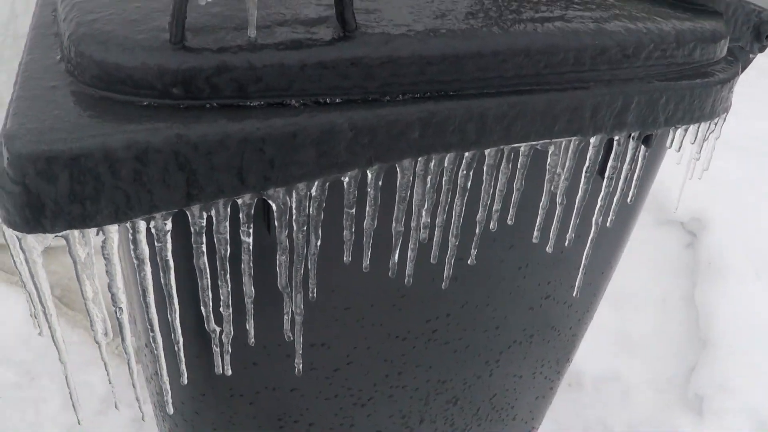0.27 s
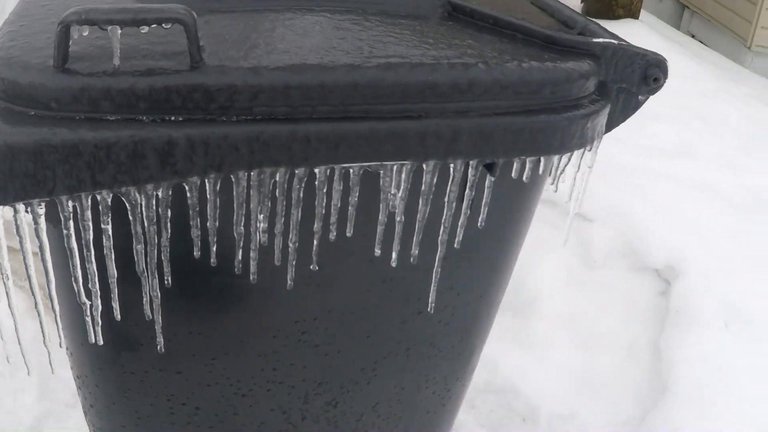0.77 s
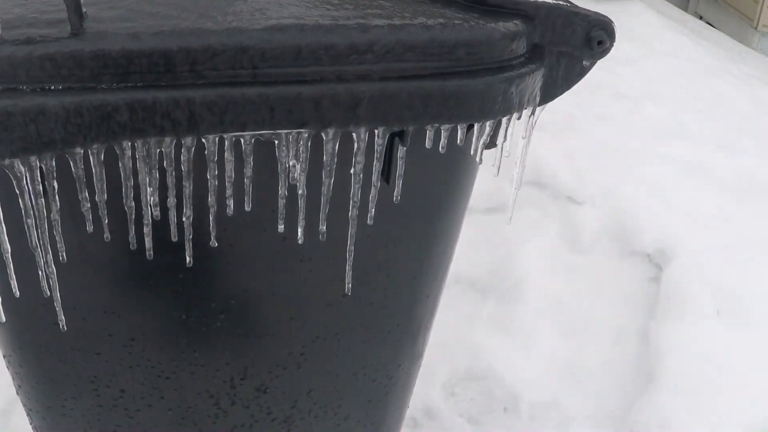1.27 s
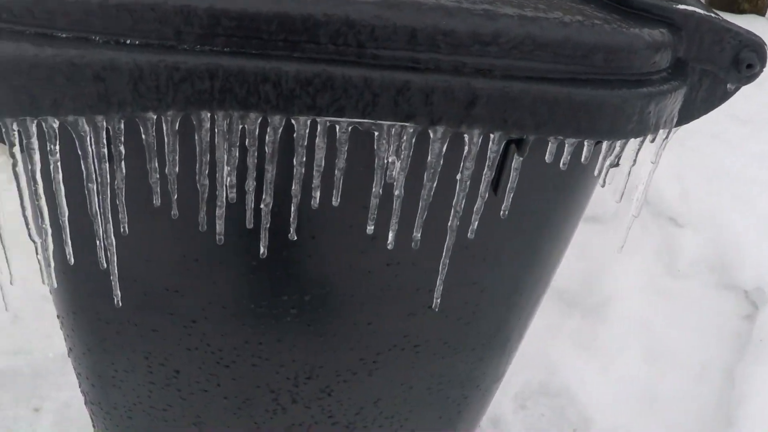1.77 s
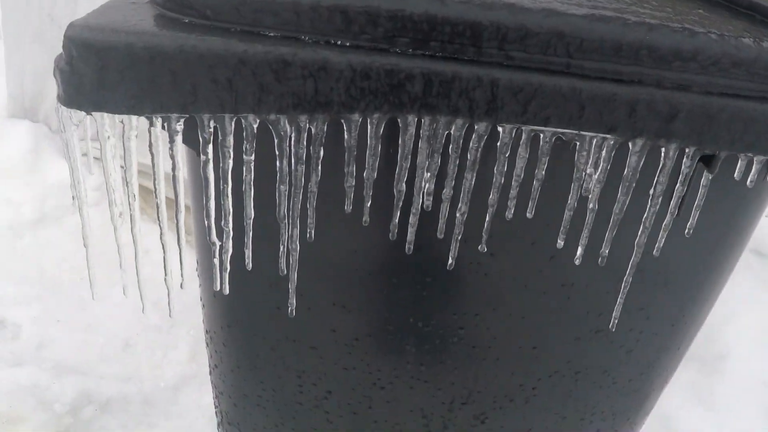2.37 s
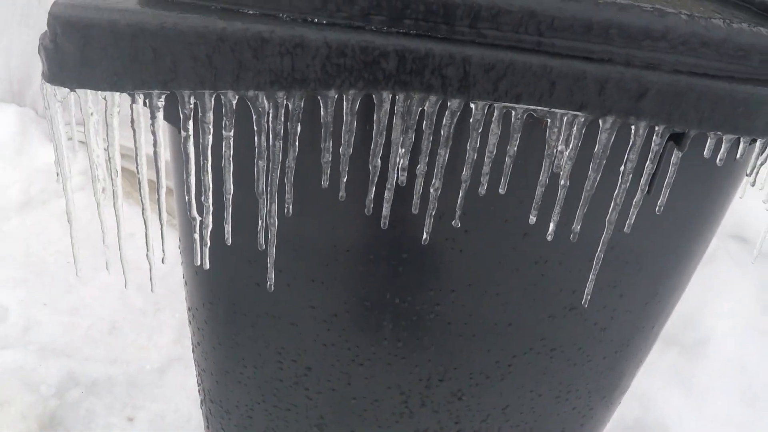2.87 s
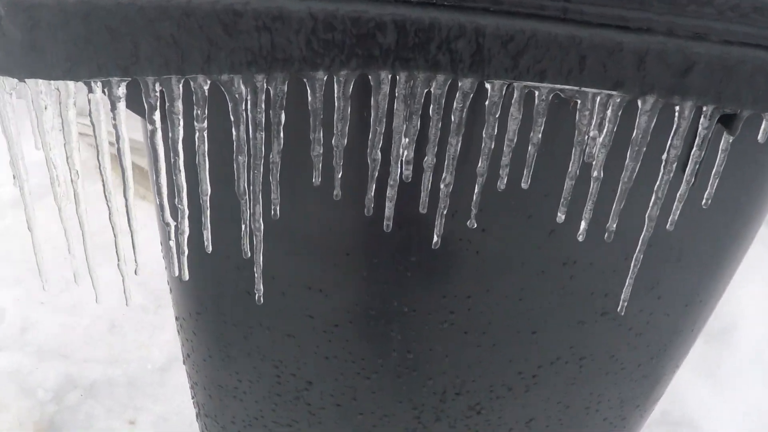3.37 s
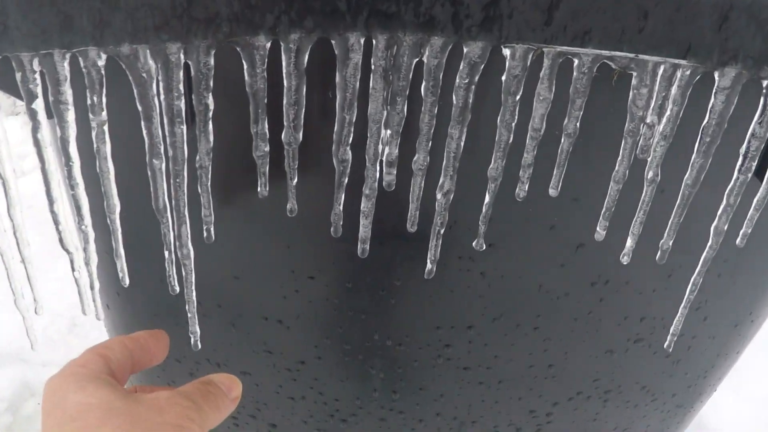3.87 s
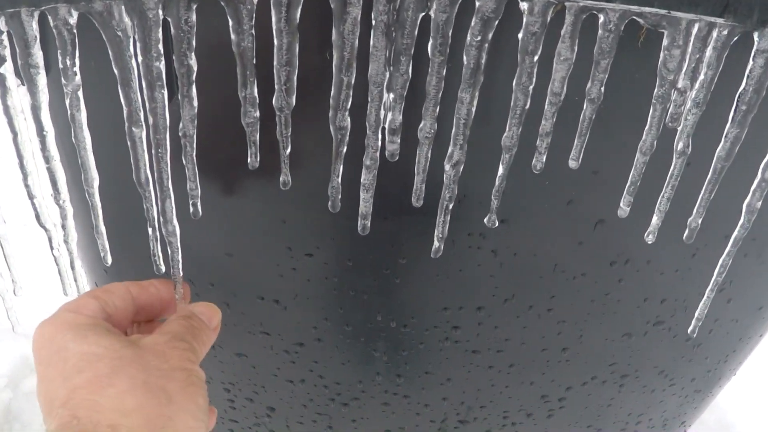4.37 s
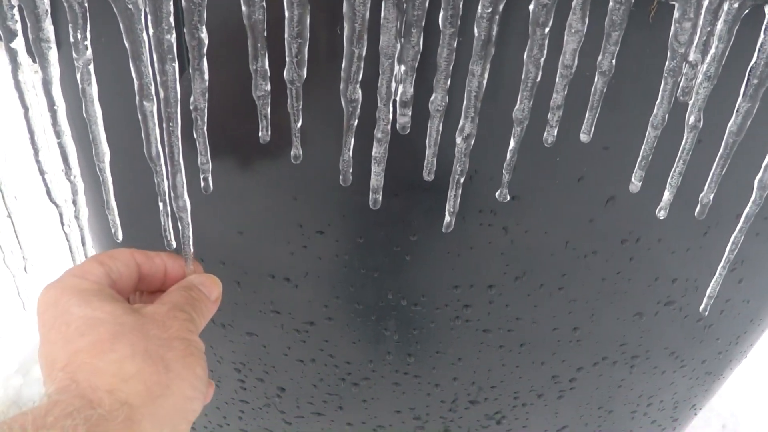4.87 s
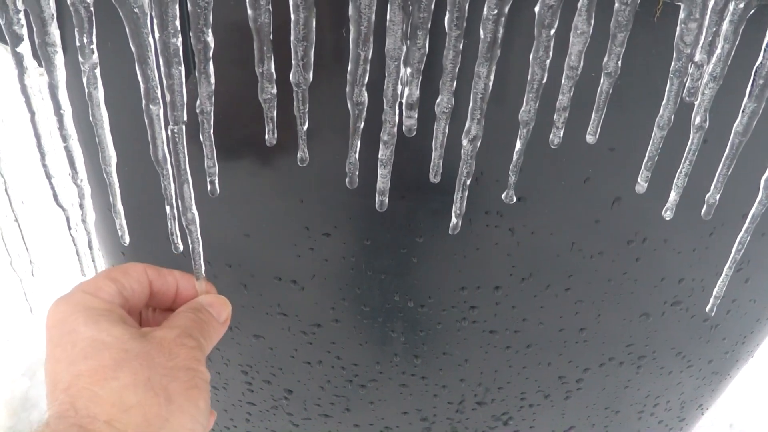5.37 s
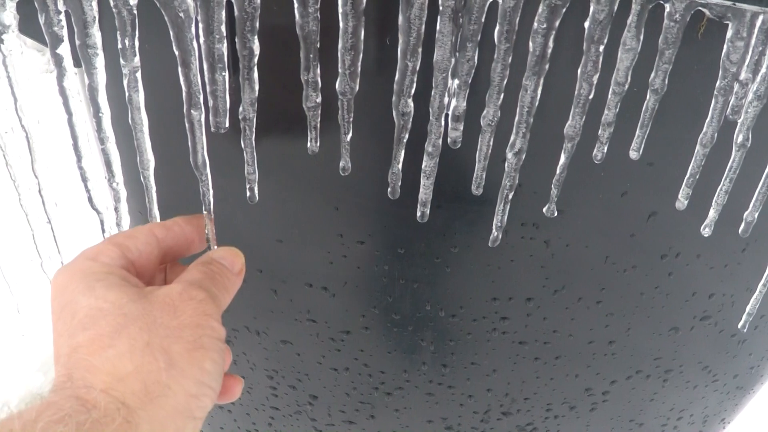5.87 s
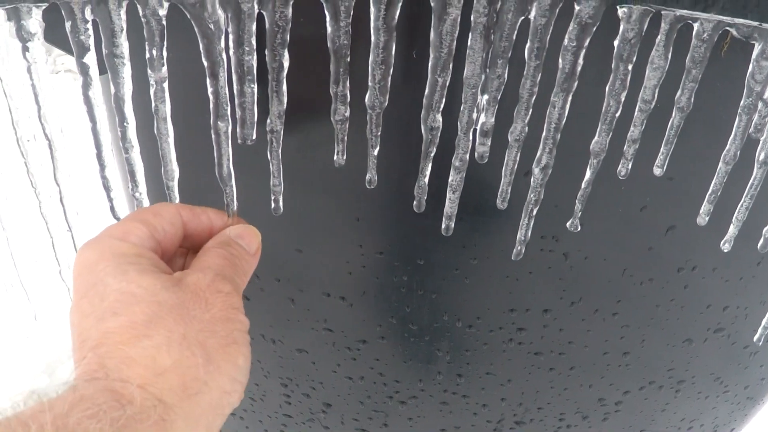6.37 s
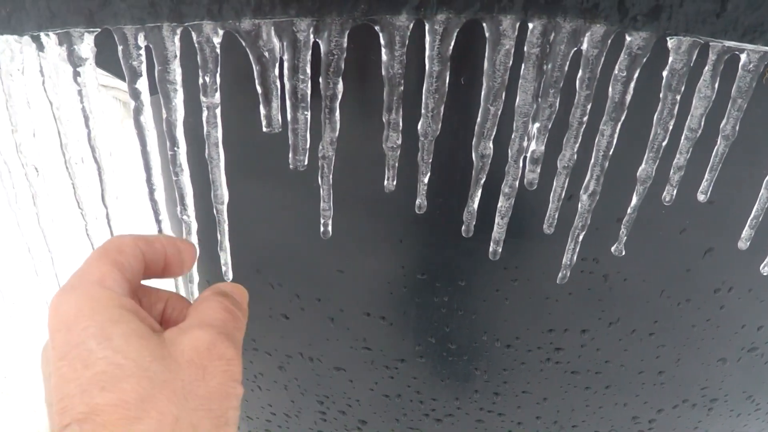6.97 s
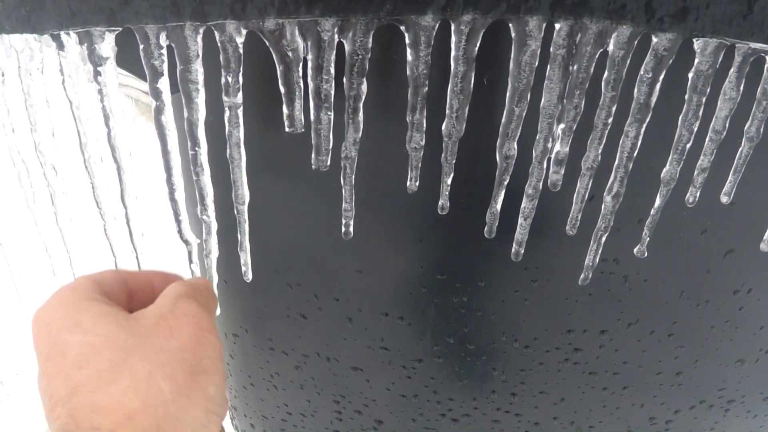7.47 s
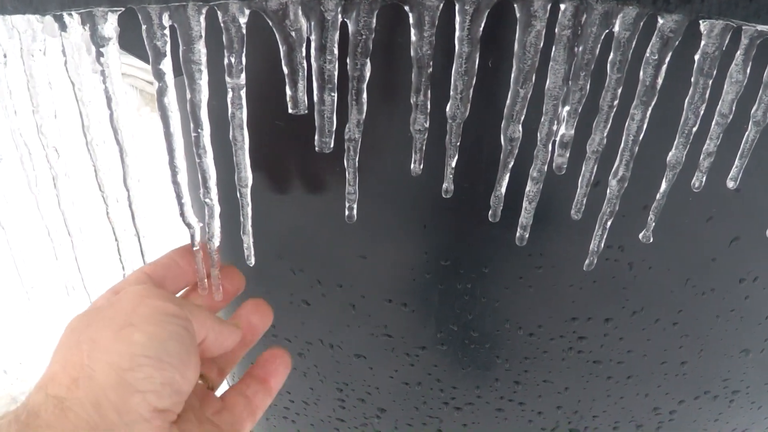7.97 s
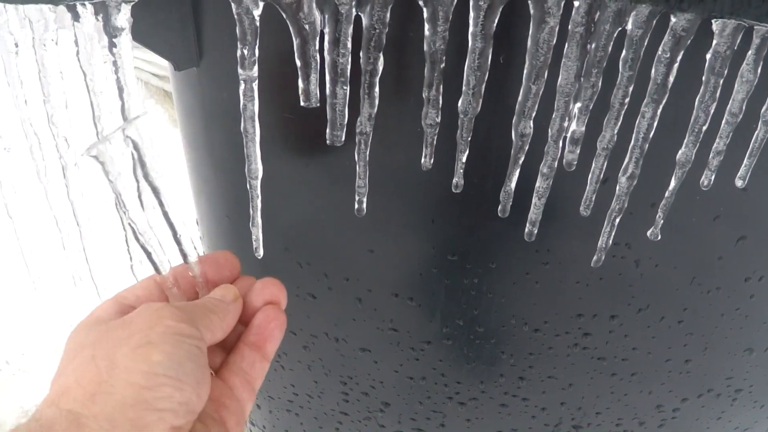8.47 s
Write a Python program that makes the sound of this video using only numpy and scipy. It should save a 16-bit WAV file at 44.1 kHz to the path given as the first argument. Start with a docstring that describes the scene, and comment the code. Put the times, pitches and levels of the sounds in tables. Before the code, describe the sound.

Close outdoor sound in a quiet snowy yard. Slow, uneven boot steps break crisp snow crust with crackles, soft crushing and dull thuds, then stop. Soft taps follow; an icicle snaps with a hollow plastic knock, another cracks brightly, and ice ticks and squeaks against ice. More sharp breaks come near the end, one answered by the bin. A faint low rumble and hum run throughout.

```python
"""A yard in still winter air: steps on crusted snow near a plastic bin, then icicles breaking off its lid.
Crust crackles as bursts of shaped noise over crushed snow and dull low-passed thuds.
Icicles crack as filtered noise and ring as decaying modes; the hollow bin's modes answer some breaks.
Rubbed ice ticks and squeaks in tiny pings; soft taps, a hum and a distant rumble fill the rest."""
import sys
import numpy as np
from scipy import signal
from scipy.io import wavfile

SR = 44100
rng = np.random.default_rng(int(sys.argv[2]) if len(sys.argv) > 2 else 0)


def to_wav(sig):
    """Store sig (one row per channel, or 1-D mono) as 16-bit WAV at the path in sys.argv[1].

    Samples outside -1..1 are clipped; the rate is SR.
    """
    pcm = np.clip(np.atleast_2d(sig), -1, 1) * 32767
    pcm = np.round(pcm).astype(np.int16)
    wavfile.write(sys.argv[1], SR, pcm.T)  # frames by channels


N = 384417
T = np.arange(SR // 3) / SR  # time within one event, s


def amp(db):
    """Decibels to gain."""
    return 10 ** (np.asarray(db) / 20)


def evened(x):
    """Scales to rms 1."""
    return x / np.sqrt(np.mean(x ** 2) + 1e-20)


def sized(x, level_db, length_s):
    """Gives x the energy of a sound of rms level_db that lasts length_s."""
    return amp(level_db) * x * np.sqrt(length_s * SR / (np.sum(x ** 2) + 1e-20))


def add(mix, start_s, sound):
    """Mixes a sound in at start_s."""
    part = mix[max(round(start_s * SR), 0):][:len(sound)]
    part += sound[:len(part)]


def colour(x, outline):
    """Causal minimum-phase filter with the given (freq_hz, gain_db) outline."""
    hz, db = np.transpose(outline)
    grid_hz = abs(np.fft.fftfreq(8192, 1 / SR))
    gain_db = np.interp(np.log(grid_hz + 1), np.log(hz + 1), db)
    spectrum = np.exp(np.conj(signal.hilbert(np.log(amp(gain_db)))))
    impulse = np.fft.ifft(spectrum).real[:len(grid_hz) // 2]
    return signal.fftconvolve(x, impulse)[:len(x)]


def passed(x, hz, kind, order=2):
    """Low-, high- or band-pass."""
    sos = signal.butter(order, np.clip(hz, 10, SR / 2.1), kind, fs=SR, output="sos")
    return signal.sosfilt(sos, x)


def drift(rate_hz, size=N):
    """Random line of rms 1 with rate_hz knots a second."""
    knots = rng.standard_normal(int(size / SR * rate_hz) + 3)
    return evened(np.interp(np.arange(size) / SR * rate_hz, np.arange(len(knots)), knots))


def held(start_s, end_s, attack_s, release_db_per_s):
    """Envelope that rises from start_s and falls after end_s."""
    t = np.arange(N) / SR
    rise = np.clip((t - start_s) / attack_s, 0, 1)
    return rise * amp(-release_db_per_s * np.maximum(t - end_s, 0))


def ring(modes):
    """Dying modes; each blow lands on another spot and weights them anew."""
    out = np.zeros(len(T))
    for hz, db, t60_s in modes:
        decay = amp(db + rng.normal(0, 2.1) - 60 * T / t60_s)
        out += decay * rng.choice([-1, 1]) * np.sin(2 * np.pi * hz * T)
    return out


def fracture(length_s, t60_s, tail_db, tail_t60_s, grain_db):
    """A run of tiny ruptures lasts length_s, then dies away with a slower scatter."""
    after_s = np.maximum(T - length_s, 0)
    shape = amp(-60 * after_s / t60_s) + amp(tail_db - 60 * after_s / tail_t60_s)
    return shape * rng.standard_normal(len(T)) * amp(grain_db * drift(1497, size=len(T)))


# distant rumble and hiss, relative outline: freq_hz, gain_db
AIR_OUTLINE = [(12, -30), (20, 1), (64, 2.5), (116, -6.5), (140, -14.5), (166, -10), (202, -14),
               (245, -9.5), (266, -14.5), (362, -7.5), (631, -24), (1010, -33.5), (1450, -35.5),
               (5090, -39.5), (15500, -52)]
# hum partials, centre pitch and level: pitch_hz, level_db
HUM_PARTIALS = [(64, -72), (119, -74.5), (241, -67), (361, -74), (403, -76)]


def background():
    """Low distant rumble under thin hiss, with a hum wavering in pitch and level."""
    air_db = -54.5 + 0.37 * drift(2.2)
    out = evened(colour(rng.standard_normal(N), AIR_OUTLINE)) * amp(air_db)
    for hz, db in HUM_PARTIALS:
        level = amp(db + 3.1 * drift(5.7)) * np.sqrt(2)
        phase = 2 * np.pi * np.cumsum(hz + 2.206 * drift(14)) / SR
        out += level * np.sin(phase)
    return out


# boot's weight resting on packed snow: set_down_s, lifted_s, fizz_db
BOOT_LOADS = [(-.06, .22, -66), (.56, 0.794, -63), (1.244, 1.483, -71), (1.589, 2.04, -66),
              (2.653, 2.998, -70.5), (3.137, 3.557, -67)]
# cracking crust, relative outline: freq_hz, gain_db
CRUST_OUTLINE = [(880, -39.5), (1500, -12), (1920, -7.5), (2520, -6.5), (2890, -2.5), (3610, -9),
                 (5040, -4.5), (6960, -13.5), (7600, -14.5), (8620, -20), (13800, -23), (15500, -16)]
# snow crushed by a medium step, relative outline: freq_hz, gain_db
CRUSH_OUTLINE = [(480, -35), (780, 6), (1050, 8), (1650, -1.5), (2700, -30.5)]
LOAD_S, RELAX_DB_PER_S = 0.07, 59  # fizz swell under load; fade once lifted


def settling():
    """Fine grains keep giving way in clumps while weight rests on the snow."""
    loads = [amp(db) * held(start_s, end_s, LOAD_S, RELAX_DB_PER_S) for start_s, end_s, db in BOOT_LOADS]
    level = np.max(loads, axis=0)
    edges_hz = np.geomspace(1000, 15500, num=6)
    fizz = rng.standard_normal(N)
    for band_hz in zip(edges_hz, edges_hz[1:]):  # coarse and fine grains break independently
        hits = rng.random(N) < 200 / SR  # 200 a second
        grains = hits * amp(4.5 * np.minimum(rng.exponential(1, N), 3.5))
        bursts = signal.oaconvolve(grains, amp(-60 * T / 0.014))[:N] * rng.standard_normal(N)
        fizz += passed(evened(bursts), band_hz, "band") * amp(3.6 * drift(25))
    crust = evened(colour(fizz, CRUST_OUTLINE))
    crush = evened(colour(fizz, CRUSH_OUTLINE))
    powder = evened(passed(fizz, 4700, "high"))
    return level * (crust + amp(-9.5) * crush + amp(-21.5) * powder)


CRUSH_DB = -7.5  # against the mean of crackle_db and thud_db
YIELD_DB, YIELD_SLOPE = -27, 1.34  # past this thud_db the snow gives way: extra crush dB per dB


def crunch(length_s, crackle_db, thud_db, thud_hz):
    """A piece of crust crackles, the snow below is crushed, and the boot thuds down."""
    crackle = fracture(length_s, t60_s=0.012, tail_db=-8, tail_t60_s=0.095, grain_db=4.5)
    crackle *= np.clip(T / (0.4 * length_s), 0.2, 1)  # break spreads as the weight comes on
    crackle = colour(crackle, CRUST_OUTLINE)

    squash = fracture(0.56 * length_s, t60_s=0.0065, tail_db=-11, tail_t60_s=0.073, grain_db=5)
    stiffness = np.clip(2 ** ((thud_db + 34) / 22), 0.8, 1.45)  # harder steps pack snow, raise pitch
    crush = colour(squash, [(hz * stiffness, db) for hz, db in CRUSH_OUTLINE])
    crush_db = (crackle_db + thud_db) / 2 + CRUSH_DB
    crush_db += YIELD_SLOPE * max(thud_db - YIELD_DB, 0)

    push = fracture(0.65 * length_s, t60_s=0.015, tail_db=-12, tail_t60_s=0.057, grain_db=3.5)
    thud = passed(push, thud_hz * 0.48, "high", order=3)
    thud = passed(thud, thud_hz * 1.55, "low")
    thud = passed(thud, 612, "low", order=6)  # snow muffles the blow

    out = sized(crackle, crackle_db, length_s)
    out += sized(crush, crush_db, length_s)
    return out + sized(thud, thud_db, length_s)


# boots breaking the crust: start_s, length_s, crackle_db, thud_db, thud_hz
CRUST_PIECES = [(.094, 0.0054, -40, -30, 204), (0.155, 0.018, -79, -47, 169),
                (0.199, 0.018, -47.5, -45.5, 250), (0.217, 0.0093, -47, -40, 328),
                (0.269, 0.0064, -50.5, -49, 280), (0.3352, 0.0016, -48, -36, 463),
                (0.555, .0025, -37.5, -67, 300), (0.586, 0.0022, -40.5, -51, 230),
                (0.615, 0.012, -50.5, -43, 307), (0.675, 0.0097, -54, -44.5, 278),
                (0.722, 0.0043, -47.5, -49, 380), (0.7336, 0.01, -38, -37.5, 360),
                (0.747, 0.0091, -44, -35.5, 300), (0.82, 0.018, -48, -46, 350),
                (1.142, 0.17, -75, -54.5, 189), (1.274, 0.011, -36.5, -38, 385),
                (1.288, 0.0058, -41.5, -51, 390), (1.311, 0.019, -40.5, -50, 420),
                (1.324, 0.01, -38, -34, 410), (1.337, .011, -44.5, -41.5, 463),
                (1.354, 0.02, -55, -49.5, 300), (1.395, 0.0063, -55.5, -48.5, 190),
                (1.457, 0.0053, -56, -52, 310), (1.611, 0.0065, -44, -49, 240),
                (1.628, 0.014, -44.5, -37, 250), (1.6644, 0.0023, -41.5, -52, 280),
                (1.735, 0.0017, -43, -48.5, 490), (1.744, 0.0062, -42.5, -50, 530),
                (1.827, 0.031, -93, -46, 188), (1.864, .011, -45, -30, 241), (2.265, 0.0033, -53, -58, 290),
                (2.788, 0.004, -47, -54, 320), (2.84, 0.005, -48, -64, 310),
                (2.8542, 0.0057, -38.5, -23, 348), (2.8618, .0092, -39.5, -32, 290),
                (2.874, 0.0057, -46, -34, 221), (3.169, 0.0081, -40.5, -38.5, 445),
                (3.188, 0.0038, -44.5, -40, 290), (3.234, 0.021, -53.5, -44, 330),
                (3.253, 0.0067, -51, -43, 210), (3.2917, 0.016, -49, -46, 240),
                (3.3155, .0037, -43, -57, 430), (3.334, 0.01, -37.5, -31, 335),
                (3.35, .011, -39, -31.5, 430), (3.357, 0.015, -44.5, -35, 370),
                (3.404, .003, -59, -49, 340), (3.483, 0.01, -55, -44, 285),
                (3.5235, 0.0039, -51, -43.5, 432), (3.547, 0.012, -60.5, -42, 240)]


def footsteps():
    """The large pieces of crust break one after another."""
    out = np.zeros(N)
    for start_s, *piece in CRUST_PIECES:
        add(out, start_s, crunch(*piece))
    return out


CRUMB_GAP_S, CRUMB_SPREAD_DB = 1 / 8.7, 1.5


def crumbs():
    """Small pieces break at random, about one per gap, while a boot is down."""
    out = np.zeros(N)
    for set_down_s, lifted_s, _ in BOOT_LOADS:
        for slot_s in np.arange(set_down_s + LOAD_S, lifted_s, CRUMB_GAP_S):
            start_s = rng.uniform(slot_s, min(slot_s + CRUMB_GAP_S, lifted_s))
            db = rng.normal(0, CRUMB_SPREAD_DB)
            add(out, start_s, crunch(0.0023, crackle_db=-59 + db, thud_db=-55 + db, thud_hz=268))
    return out


# soft taps, like drips landing close by: start_s, knock_db, overtone_db
SOFT_TAPS = [(2.452, -56.5, -84), (2.588, -62, -79), (3.661, -59.5, -89), (3.709, -64, -93),
             (4.181, -59.5, -89), (4.244, -56.5, -87), (4.343, -65.5, -87), (5.45, -58, -90),
             (7.083, -51, -77), (7.387, -57.5, -74), (7.892, -57.5, -82), (8.05, -57.5, -68.5),
             (8.244, -58, -75), (8.37, -49.5, -68), (8.6632, -43, -58.5)]
# knock modes, relative: pitch_hz, level_db, t60_s
KNOCK_MODES = [(877, -6, 0.032), (1034, 0.5, 0.051), (1160, -8.5, 0.04)]
# modes above the knock, relative: pitch_hz, level_db, t60_s
OVERTONE_MODES = [(2250, -3, 0.034), (2650, -3, 0.026), (2926, -9, 0.068), (3260, -6, 0.03)]


def taps():
    """Soft blows give a dull tock; only the harder ones leave a clear ring."""
    outline = [(400, -21.0), (750, -1.0), (1150, 0.0), (1600, -29), (3000, -25.0), (8000, -36)]  # Hz, dB
    out = np.zeros(N)
    for start_s, knock_db, overtone_db in SOFT_TAPS:
        blow = colour(amp(-60 * T / 0.00052), outline)
        ringing = np.clip((knock_db + 60) / 24, 0.1, 0.65)  # ringing share of the energy
        overtones = ring(OVERTONE_MODES) * amp(-60 * T / 0.05)
        add(out, start_s, sized(blow, knock_db, 0.0078) * np.sqrt(1 - ringing))
        add(out, start_s, sized(ring(KNOCK_MODES), knock_db, 0.009) * np.sqrt(ringing))
        add(out, start_s, sized(overtones, overtone_db, 0.014))
    return out


# voices of the rubbed rod, relative level: pitch_hz, width_hz, level_db
ROD_VOICES = [(4124, 68, -9.5), (11000, 450, -19)]


def tick(click_db, ring_db, ring_hz):
    """One slip clicks and sets the rod ringing."""
    slip = fracture(0.0012, t60_s=0.0058, tail_db=-8.5, tail_t60_s=0.044, grain_db=8.0)
    outline = [(1200, -32.0), (2600, -3.0), (5500, 8.5), (8500, -2.5), (10500, -1.5), (15000, -3)]  # Hz, dB
    click = colour(slip, outline)
    rod = [(ring_hz, 0, 0.032), (ring_hz * 1.025, -3, 0.02), (ROD_VOICES[0][0], -15, 0.04)]
    return sized(click, click_db, 0.0042) + sized(ring(rod), ring_db, 0.0066)


# clearest ticks of ice against ice: start_s, click_db, ring_db, ring_hz
ICE_TICKS = [(4.777, -58, -84, 8400), (5.8177, -51, -59, 7900), (5.9378, -54.5, -66, 7740),
             (5.9642, -54.5, -72, 8800), (6.0067, -55, -48.5, 8650), (6.027, -53, -46.5, 8700),
             (6.052, -54, -57, 7760), (6.0715, -56, -62, 8800), (6.098, -61, -60, 8500),
             (6.126, -58.5, -58.5, 8660), (6.205, -62, -58.5, 8600), (6.2264, -68, -49, 8620),
             (6.524, -56, -61.5, 8540), (6.569, -68, -56.5, 8170), (6.599, -57.5, -65, 7970),
             (7.1522, -45, -53, 7600), (7.1817, -54.5, -83, 7900), (7.237, -57, -80, 8010),
             (7.262, -57, -75, 7900), (7.2966, -60, -87, 8040)]


def ticks():
    """A loose icicle catches on its neighbours and jumps free."""
    out = np.zeros(N)
    for start_s, *slip in ICE_TICKS:
        add(out, start_s, tick(*slip))
    return out


# icicles breaking or bumping: start_s, length_s, crack_db, low_edge_hz, high_corner_hz,
# ring_db, knock_db, overtone_db, boom_db
ICE_BREAKS = [(4.9767, 0.0014, -36.5, 1200, 6440, -83, -37, -52, -40.5),
              (5.8292, 0.0087, -28, 3600, 5250, -34.5, -69, -57, -81),
              (6.4099, 0.016, -43.5, 900, 5740, -49, -45, -65, -35.5),
              (7.0942, 0.0034, -30.5, 4600, 5970, -75, -61, -61, -80),
              (8.1823, 0.0042, -31.5, 550, 2560, -73.5, -40, -38, -39.5),
              (8.212, 0.0035, -62, 2200, 3020, -73, -73, -75, -45.5)]
# icicle modes, relative: pitch_hz, level_db, t60_s
ICICLE_MODES = [(3570, 9, 0.026), (3850, -7, 0.071), (5740, 1, .025), (8040, 2, 0.028), (9200, -6, 0.032),
                (10860, -14, .04)]
# hollow bin modes, relative: pitch_hz, level_db, t60_s
BIN_MODES = [(118.5, -1.5, 0.18), (192, 0, 0.13), (329, -5, 0.18), (426, -1, 0.092), (627, -11, 0.16),
             (802, -2.5, 0.067), (854, -18, 0.081)]


def breaks():
    """A crack crosses the ice; thin tips snap brightly, thick roots also shake the bin."""
    out = np.zeros(N)
    for start_s, length_s, crack_db, low_hz, high_hz, *mode_levels_db in ICE_BREAKS:
        run = fracture(0.25 * length_s, t60_s=0.0039, tail_db=2.5, tail_t60_s=0.04, grain_db=0.5)
        crack = passed(run, low_hz, "high", order=5)
        crack = passed(crack, high_hz, "low", order=1)
        crack += passed(crack, high_hz * 1.4, "low")
        add(out, start_s, sized(crack, crack_db, length_s))
        bodies = ICICLE_MODES, KNOCK_MODES, OVERTONE_MODES, BIN_MODES
        for modes, db in zip(bodies, mode_levels_db):
            add(out, start_s + 0.0005, sized(ring(modes), db, 0.008))
    return out


# ice rubbing on ice: start_s, end_s, squeak_db, mean_click_db, ring_hz, whistle_db (at ring_hz)
ICE_RUBS = [(5.852, 6.133, -68, -68, 8720, -88), (6.263, 6.463, -71, -63, 8600, -84),
            (6.51, 6.63, -61, -62.5, 8030, -78), (7.228, 7.33, -83, -64, 7850, -86),
            (7.436, 7.59, -90, -71.5, 7800, -83)]
GRIP_S, LET_GO_DB_PER_S = 0.022, 193  # squeak rise and fall
WHISTLE_WIDTH_HZ = 200


def rubbing():
    """Ice sticks and lets go in random tiny pings, at nine close pitches per voice."""
    out = np.zeros(N)
    for start_s, end_s, squeak_db, _, ring_hz, whistle_db in ICE_RUBS:
        level = held(start_s, end_s, GRIP_S, LET_GO_DB_PER_S)[round(start_s * SR):][:SR]
        voices = [(hz, width_hz, squeak_db + db) for hz, width_hz, db in ROD_VOICES]
        voices.append((ring_hz, WHISTLE_WIDTH_HZ, whistle_db))
        for hz, width_hz, db in voices:
            pings = np.zeros(len(level))
            for offset in np.linspace(-1, 1, num=9):
                hits = rng.random(len(level)) < 11 / SR  # 11 a second
                slips = hits * amp(3.7 * rng.standard_normal(len(level)))
                ping = ring([(hz + 0.63 * width_hz * offset, 0, 0.035)])
                ping *= np.clip(T / 0.0044, 0, 1)
                pings += signal.oaconvolve(slips, ping)[:len(level)]
            add(out, start_s, amp(db) * level * evened(pings))
    return out


SLIP_GAP_S, SLIP_JITTER_S = 0.027, 0.01
SLIP_SPREAD_DB, SLIP_RING_DB = 2, -14  # click spread; ring against click


def chatter():
    """Rubbed ice sticks and slips at an uneven pace, in faint ticks."""
    out = np.zeros(N)
    for start_s, end_s, _, mean_click_db, ring_hz, _ in ICE_RUBS:
        for slip_s in np.arange(start_s, end_s, SLIP_GAP_S):
            click_db = rng.normal(mean_click_db, SLIP_SPREAD_DB)
            sound = tick(click_db, click_db + SLIP_RING_DB, ring_hz)
            add(out, rng.normal(slip_s, SLIP_JITTER_S), sound)
    return out


def yard(x):
    """A weak, short echo scattered by the bin, the ground and a house wall."""
    echo = rng.standard_normal(len(T)) * amp(-60 * T / 0.18)
    echo *= np.clip((T - 0.012) / 0.015, 0, 1)
    echo = passed(echo, 9800, "low", order=1)
    return signal.fftconvolve(x, echo / np.linalg.norm(echo))[:N]


def scene():
    """Steps, then ice, in the open air."""
    bed = background() + settling()
    steps = footsteps() + crumbs()
    ice = taps() + ticks() + breaks() + rubbing() + chatter()
    echo = yard(amp(-24) * steps + amp(-27.5) * ice)
    return (bed + steps + ice + echo)[None]


def record(dry):
    """Band limit: linear-phase low-pass."""
    lowpass = signal.firwin(301, 15450, window=("kaiser", 8), fs=SR)  # edge in Hz
    return signal.oaconvolve(dry, lowpass[None], "same")


dry = scene()
out = record(dry)
to_wav(out)
```